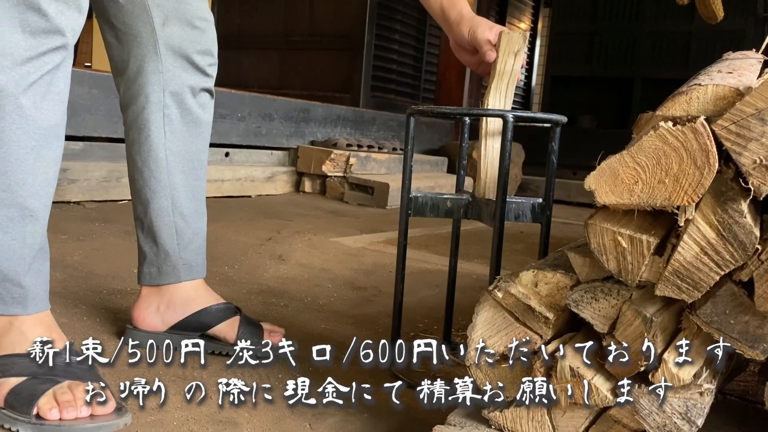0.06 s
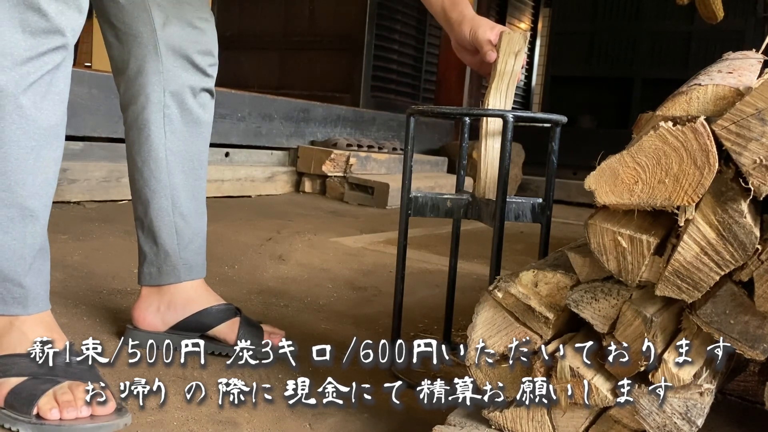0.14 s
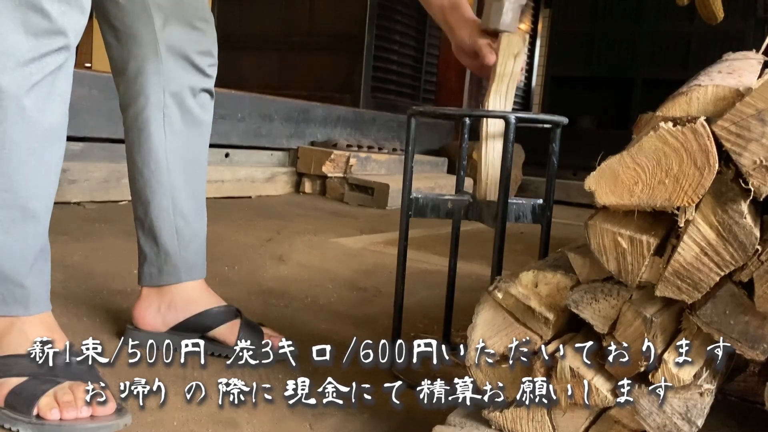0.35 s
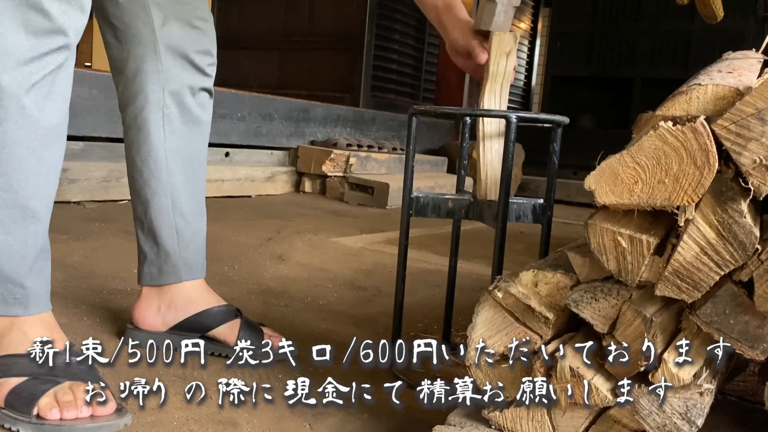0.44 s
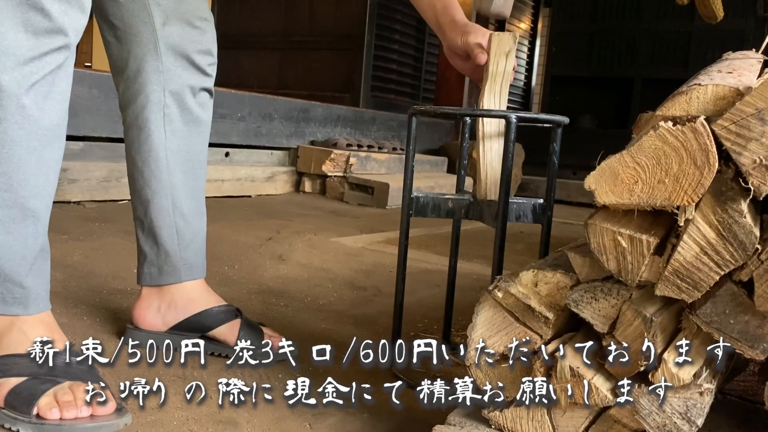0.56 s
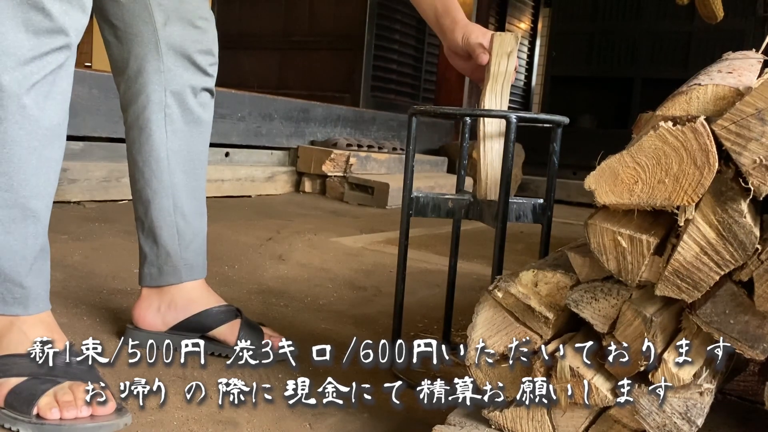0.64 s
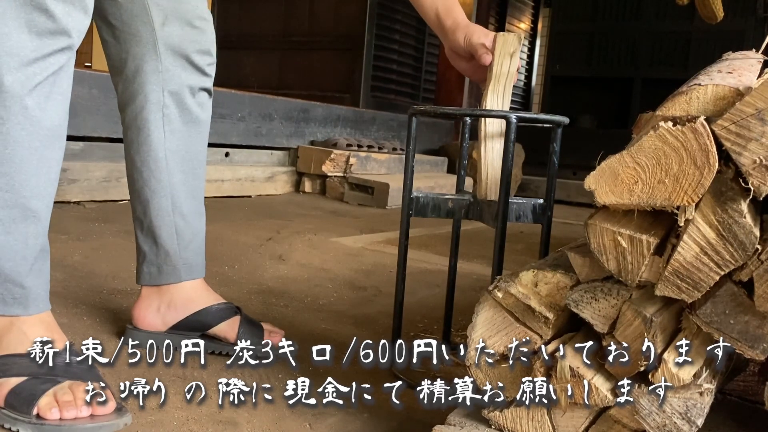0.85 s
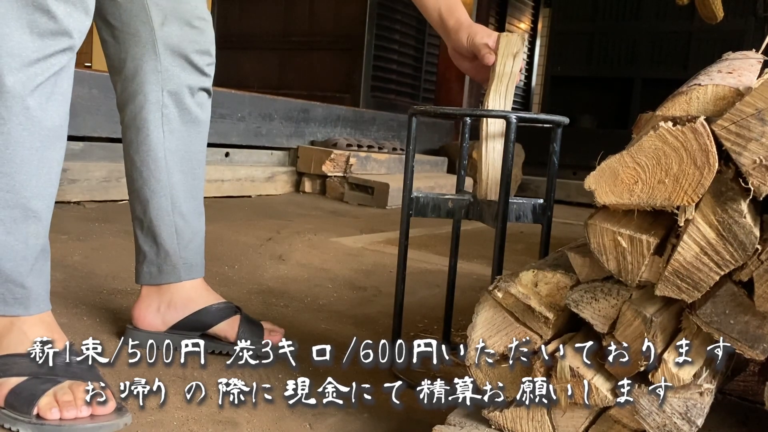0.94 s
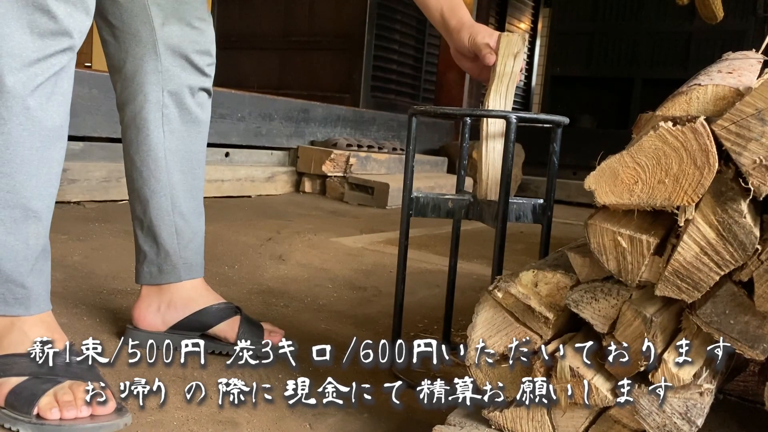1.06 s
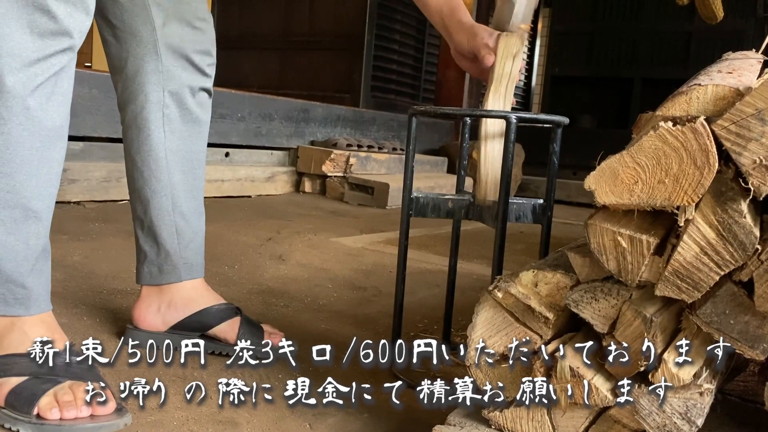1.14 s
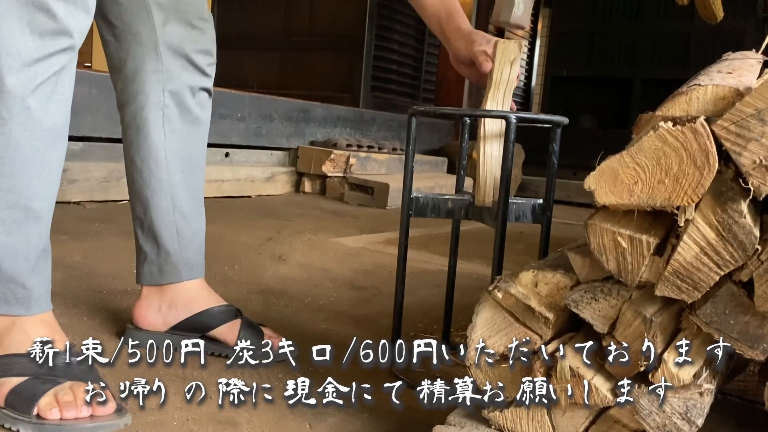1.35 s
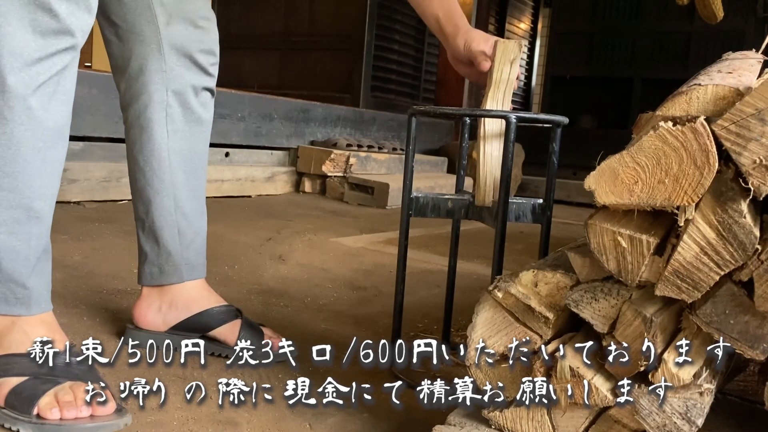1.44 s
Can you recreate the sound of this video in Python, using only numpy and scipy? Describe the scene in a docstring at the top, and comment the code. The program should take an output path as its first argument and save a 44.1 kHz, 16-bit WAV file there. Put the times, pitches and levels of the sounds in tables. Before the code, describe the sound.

Firewood being split: two sharp mallet blows, each a wooden crack with a ringing steel stand.

```python
"""Splitting kindling at the mouth of a shed, over a low rumble and a thin hiss.
At 0.2 s a mallet drives a stick of firewood onto the splitter's steel blade: the wood cracks,
the legs thump the floor and the frame rings. At 0.4 s the stick settles with a light knock.
Near 1.2 s a second blow lands with less body and a brighter ring.
A limiter ducks each blow, then lets the tail back up."""
import sys
import numpy as np
from scipy import signal
from scipy.fft import rfft, irfft, next_fast_len
from scipy.io import wavfile
from scipy.ndimage import uniform_filter1d, minimum_filter1d, map_coordinates

SR = 44100
rng = np.random.default_rng(int(sys.argv[2]) if len(sys.argv) > 2 else 0)


def wav_out(sig):
    """Save sig, one row per channel (or a flat mono array), as 16-bit PCM at SR to the path in sys.argv[1]."""
    wavfile.write(sys.argv[1], SR, np.round(np.clip(np.atleast_2d(sig).T, -1, 1) * 32767).astype(np.int16))


N = 66150

# tone curve of the crack: f/Hz, level/dB
CRACK_EQ = [(30, -42.5), (100, -21), (350, -9.5), (700, -4.5), (1100, -13), (1600, -3.5), (2200, -8),
            (3300, -4.5), (4500, -13), (7000, -7), (9000, -17.5), (10500, -7), (13000, -22), (15500, -19.5)]
# stereo image of the crack: f/Hz, left-right correlation
CRACK_IMAGE = [(200, .95), (2000, 0.19), (5000, 1), (9000, -.35)]
# bright modes of the stick: ratio to its pitch, level/dB, t60/s
STICK_MODES = [(.87, -6, .03), (1.03, 5, 0.021), (1.17, -7, 0.018), (1.58, -9.5, .03)]
def crack(t, pitch_hz):
    """The attack, mallet on stick: a snap, a short spill of splitting fibres and a dry wooden note."""
    snap = struck(t, 0.00053, 0.015)
    fibres = amp(-13.5) * struck(t, 0.004, 0.095)
    note = [(pitch_hz * ratio, db, t60) for ratio, db, t60 in STICK_MODES]
    return noise(CRACK_EQ, CRACK_IMAGE) * (snap + fibres) + modes(t, note, rise=0.0008)


# hollow modes of the stick: f/Hz, level/dB, t60/s
HOLLOW_MODES = [(392, -9, 0.051), (731, -4, 0.052), (1218, -0.5, 0.022), (1370, 3, 0.021)]
def stick_body(t):
    """The body of the hit: the stick's lower modes give a short, hollow knock."""
    return modes(t, HOLLOW_MODES, rise=0.0011)


# modes of the steel frame: f/Hz, level in blow one/dB, level in blow two/dB, t60/s
FRAME_MODES = [(678.5, -44, -43, 1.35), (1252, -55, -47, .9), (1433, -54, -32, .35), (1590, -39, -50, .38),
               (1877, -42, -35, .65), (1921, -42, -45, 1.15), (2045, -51, -43, .55), (2150, -58, -49, 1.1),
               (2359, -43, -43, .7), (2425, -45, -49, .75), (2617, -59, -48, 1.1), (2798, -39, -53, .38),
               (3243, -30, -48, .42), (3275, -42, -35, .25), (3332, -34, -49, .5), (4080, -62, -56, .8),
               (4354, -43, -45, .45), (4534, -51, -49, .5), (4814, -53, -51, .55), (5550, -60, -62, 1.2),
               (6228, -52, -62, .5), (6967, -52, -57, .55), (7025, -52, -45, .48), (7095, -47, -44, .3),
               (7526, -62, -44, .45), (7993, -57, -59, .42), (8522, -52, -64, .25), (10322, -65, -54, .8)]
def frame_ring(t, blow):
    """The clear ring of the steel; its balance changes as the stick sinks onto the blade."""
    beat_hz, twin_gain, pan_spread_db = 4.5, 0.67, 4.5  # each mode beats with a weaker twin
    out = np.zeros((2, N))
    for hz, *levels_db, t60 in FRAME_MODES:
        phase, left_phase, right_phase, detune = rng.random(4)
        pan = amp(pan_spread_db * rng.normal() * np.array([[0.5], [-0.5]]))
        main = pan * np.sin(2 * np.pi * (hz * t + phase))
        twin_hz = hz + beat_hz * (0.5 + detune)
        twin = np.sin(2 * np.pi * (twin_hz * t + np.array([[left_phase], [right_phase]])))
        out += amp(levels_db[blow]) * struck(t, 0.0021, t60) * (main + twin_gain * twin)
    return out


# tone curve of the metallic wash: f/Hz, level/dB
WASH_EQ = [(40, -30.5), (120, -10), (250, -3), (500, -6), (1000, -5.5), (2000, 1.5), (2750, -3),
           (3300, -1.5), (4200, -8), (5800, -14), (7300, -11), (9000, -27.5), (11000, -16.5), (15500, -31)]
# stereo image of the wash, also used for the light knock: f/Hz, left-right correlation
WASH_IMAGE = [(100, 0.88), (300, .7), (600, 0.18), (2000, -0.081), (4500, .45), (9000, -.1)]
# decay of the wash before each blow's stretch: f/Hz, t60/s
WASH_DECAY = [(200, 0.42), (700, 0.71), (2000, 0.59), (4000, 0.57), (8000, 0.45), (15000, 0.35)]
def steel_wash(t, tilt_db, stretch):
    """The tail: a crowd of weak steel modes and the shed's answer, each band dying at its own speed."""
    crowd = noise(WASH_EQ, WASH_IMAGE, tilt_db, spread_db=6)
    hz, slice_s, bands = signal.stft(crowd, SR, nperseg=256)
    age = np.interp(slice_s, np.arange(N) / SR, t)
    t60 = stretch * along(WASH_DECAY, hz)[:, None]
    _, tail = signal.istft(bands * fade(age, t60), SR, nperseg=256)
    attack = 1 - np.exp(-t / 0.005)
    early_lift = 1 + amp(-9.5) * fade(t, 0.12)
    return tail[:, :N] * attack * early_lift


# modes of the stand on the floor: f/Hz, level/dB, t60/s
STAND_MODES = [(111.3, -10.5, 0.41), (189, -6, 0.14)]
# tone curve of the shed's boom: f/Hz, level/dB
BOOM_EQ = [(25, -29), (48, -9), (65, 7.5), (120, 0.5), (190, -5), (260, -23), (600, -68)]
def floor_thump(t):
    """The weight: the legs push a falling bass pulse into the floor, the stand hums, the shed booms."""
    start_hz, end_hz, drop_s = 275.7, 74, 0.0082
    hz = end_hz + (start_hz - end_hz) * np.exp(-t / drop_s)
    attack = (1 - np.exp(-t / 0.011)) ** 2
    push = np.sin(2 * np.pi * np.cumsum(hz * (t > 0)) / SR) * attack * fade(t, 0.085)
    stand = sum(amp(db) * struck(t, 0.0068, t60) * np.sin(2 * np.pi * f * t)
                for f, db, t60 in STAND_MODES)
    boom = noise(BOOM_EQ, image=[(100, 0.96)]) * struck(t, rise=0.0027, t60=0.7)
    return amp(11) * push + stand + amp(-13.5) * boom


# modes of the light knock: f/Hz, level/dB, t60/s
KNOCK_MODES = [(265, -13, 0.17), (1075, -9, .3), (1295, -3.5, 0.076), (1386, -4.5, 0.11),
               (1520, -17, 0.039), (1790, -14, 0.057)]
# tone curve of its contact tick: f/Hz, level/dB
TICK_EQ = [(60, -36), (250, -9.5), (700, -7.5), (1400, -5.5), (2200, -11), (6000, -31), (12000, -72)]
def settling_knock(t):
    """The stick settles on the blade: a dull tick over a small wooden ring."""
    tick = noise(TICK_EQ, WASH_IMAGE) * struck(t, 0.00082, 0.105)
    return amp(-0.5) * modes(t, KNOCK_MODES, rise=0.00033) + amp(-4.5) * tick


# tone curve of the rumble: f/Hz, level/dB
RUMBLE_EQ = [(20, -25), (40, -26.5), (58, 4), (80, -17.5), (150, -20), (300, -24.5), (700, -26.5),
             (1500, -36), (4000, -65)]
# tone curve of the hiss: f/Hz, level/dB
HISS_EQ = [(300, -15.5), (1500, -4), (3600, -10.5), (4600, -6), (5400, 3.5), (6500, -1.5), (8500, -21),
           (11500, -16.5), (14000, -27.5)]
# stereo image of the bed, centred lows and wide highs: f/Hz, left-right correlation
BED_IMAGE = [(60, 1), (300, 0.31), (1000, 0.1), (6000, 0.064)]
def background():
    """The bed: a gently swelling rumble and a thin, steady hiss."""
    points_per_s = 7
    points = rng.standard_normal(int(N * points_per_s / SR) + 4)
    swell_db = 1.8 * map_coordinates(points, [np.arange(N) * points_per_s / SR])
    rumble = amp(-64.5 + swell_db) * noise(RUMBLE_EQ, BED_IMAGE)
    return rumble + amp(-75) * noise(HISS_EQ, BED_IMAGE)


def amp(db):
    """Decibels to gain."""
    return 10 ** (np.asarray(db) / 20)


def along(points, hz):
    """Read a curve of (f/Hz, value) points on a log frequency axis."""
    f, values = np.transpose(points)
    return np.interp(np.log(hz + 1), np.log(f + 1), values)


def since(cue_s):
    """Seconds since the cue, zero before it."""
    return np.maximum(np.arange(N) / SR - cue_s, 0)


def fade(t, t60):
    """Decay by 60 dB every t60 seconds."""
    return amp(-60 * t / t60)


def struck(t, rise, t60):
    """Percussive envelope: quick attack, then decay, both set in seconds."""
    return (1 - np.exp(-t / rise)) * fade(t, t60)


def modes(t, rows, rise):
    """Damped sines at random phases from rows of f/Hz, level/dB, t60/s."""
    return sum(amp(db) * struck(t, rise, t60) * np.sin(2 * np.pi * (hz * t + rng.random()))
               for hz, db, t60 in rows)


def filtered(x, response):
    """Equalise x with a gain that is a function of frequency."""
    size = next_fast_len(N + SR // 2)
    return irfft(rfft(x, size) * response(np.fft.rfftfreq(size, 1 / SR)), size)[..., :N]


def noise(eq, image, tilt_db=0, spread_db=0):
    """Coloured stereo noise of rms 1, tilted per octave; spread breaks it into unequal lines."""
    def response(hz):
        width = np.arccos(np.clip(along(image, hz), -1, 1)) / 2
        scatter_db = spread_db * np.minimum(rng.standard_normal(len(hz)), np.e)
        db = along(eq, hz) + tilt_db * np.log2(hz + 1) + scatter_db
        return amp(db) * [np.cos(width), np.sin(width)]
    mid, side = filtered(rng.standard_normal((2, N)), response)
    stereo = np.array([mid + side, mid - side])
    return stereo / np.sqrt(np.mean(stereo ** 2) + 1e-20)


def limiter(x):
    """A loud hit ducks the gain at once; it holds, then climbs back."""
    threshold_db, hold_s, release_db_per_s = -22.5, 0.11, 56
    power = np.abs(uniform_filter1d(np.mean(x ** 2, axis=0), size=176))
    duck_db = np.minimum(0, threshold_db - 10 * np.log10(power + 1e-12))
    hold = int(hold_s * SR)
    held_db = minimum_filter1d(duck_db, hold, origin=(hold - 1) // 2, mode="nearest")
    climb_db = release_db_per_s * np.arange(N) / SR
    gain_db = np.minimum.accumulate(held_db - climb_db) + climb_db
    return x * amp(uniform_filter1d(gain_db, size=88))


# mallet cues: t/s, crack level/dB, stick pitch/Hz, body level/dB, thump level/dB,
# wash level/dB, wash tilt/(dB per octave), wash decay stretch
BLOW_CUES = [(.2088, -15.5, 2271, -18, -18, -29.5, -1.5, 1.035),
             (1.175, -15, 2051, -30.5, -25.5, -32.5, 0.27, 1.088)]
# cue for the settling stick: t/s, level/dB
KNOCK_CUES = [(.39, -38.5)]
def scene():
    """The mix: two layered blows and the light knock between them, over the bed."""
    out = background()
    for blow, cue in enumerate(BLOW_CUES):
        cue_s, crack_db, pitch_hz, body_db, thump_db, wash_db, tilt_db, stretch = cue
        t = since(cue_s)
        out += amp(crack_db) * crack(t, pitch_hz)
        out += amp(body_db) * stick_body(t)
        out += amp(thump_db) * floor_thump(t)
        out += amp(wash_db) * steel_wash(t, tilt_db, stretch)
        out += frame_ring(t, blow)
    for cue_s, db in KNOCK_CUES:
        out += amp(db) * settling_knock(since(cue_s))
    return out


def record(dry):
    """The master chain: limiter, a low cut that thins the deepest bass, then a steep high cut."""
    low_cut_hz, high_cut_hz = 32, 16000
    low_cut = signal.butter(2, low_cut_hz, "highpass", fs=SR, output="sos")
    thinned = signal.sosfilt(low_cut, limiter(dry))
    return filtered(thinned, lambda hz: 1 / (1 + (hz / high_cut_hz) ** 80))


dry = scene()
out = record(dry)
wav_out(out)
```